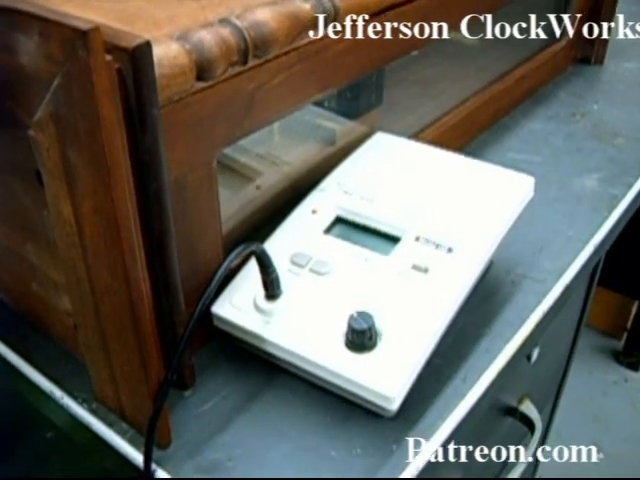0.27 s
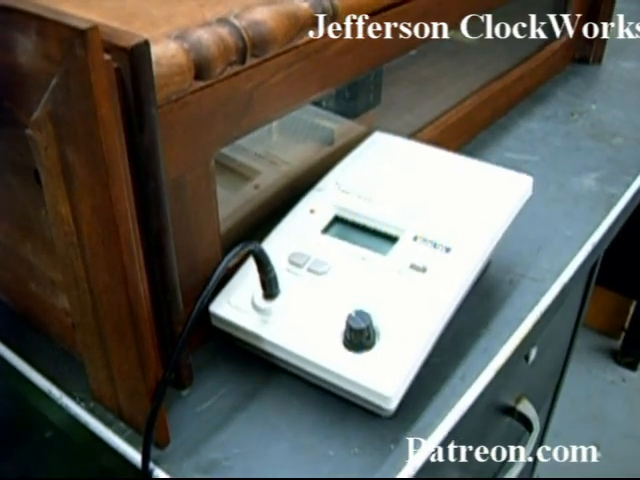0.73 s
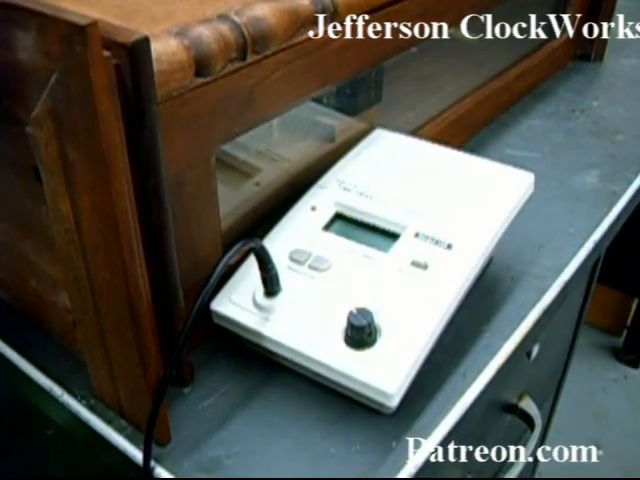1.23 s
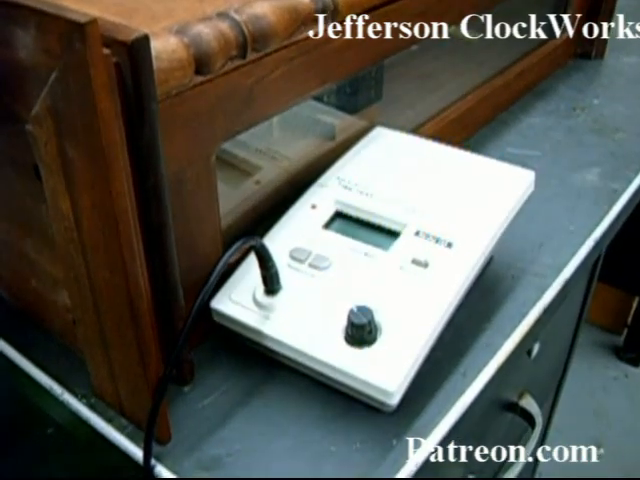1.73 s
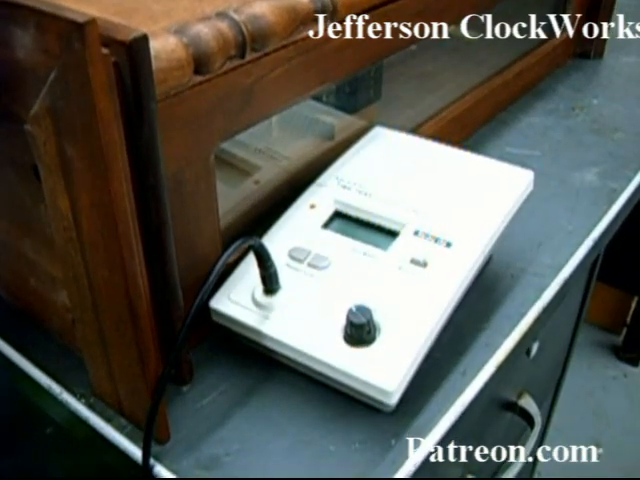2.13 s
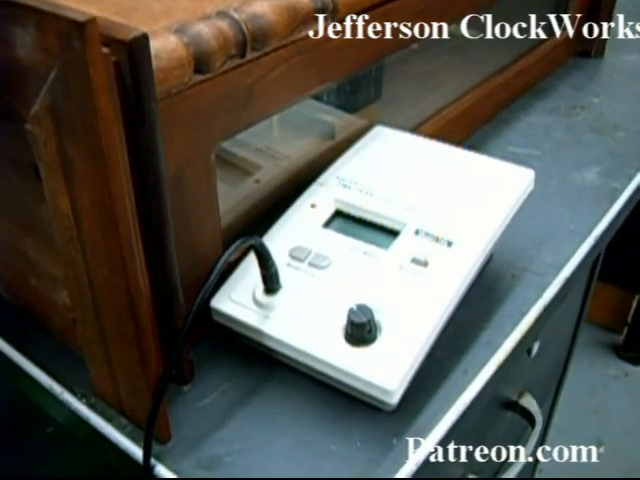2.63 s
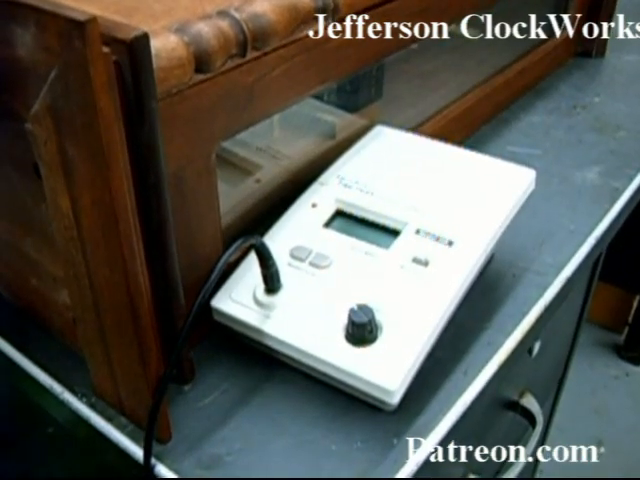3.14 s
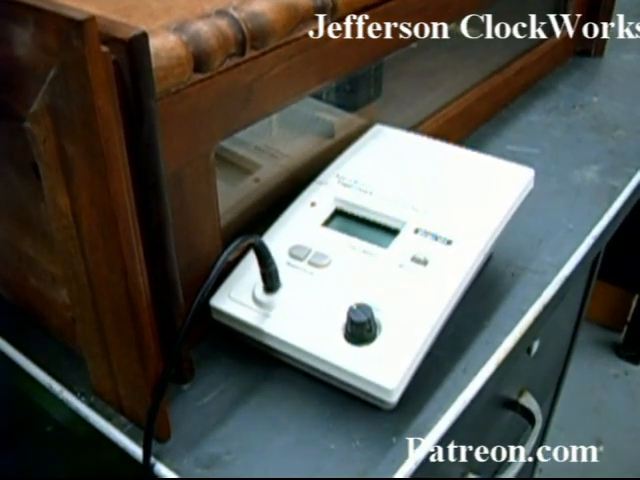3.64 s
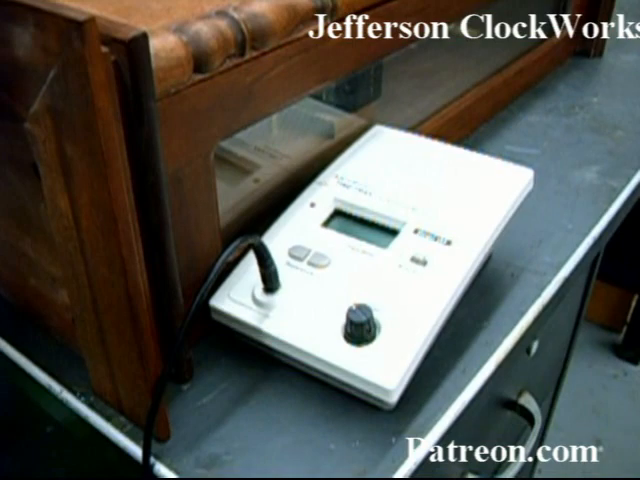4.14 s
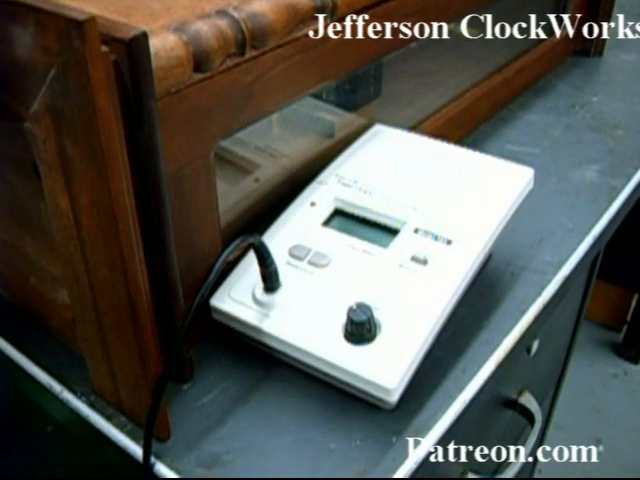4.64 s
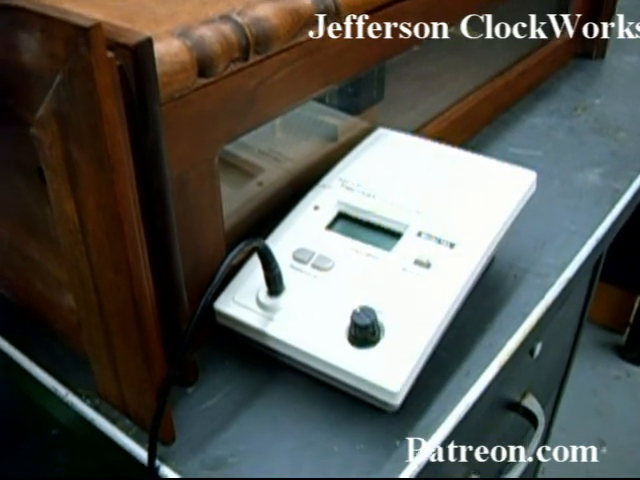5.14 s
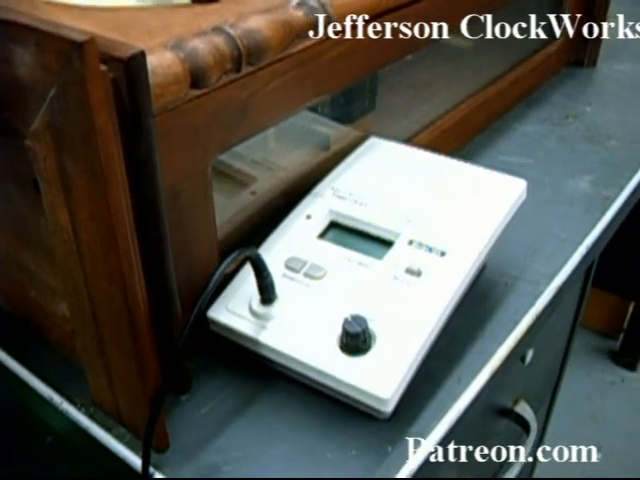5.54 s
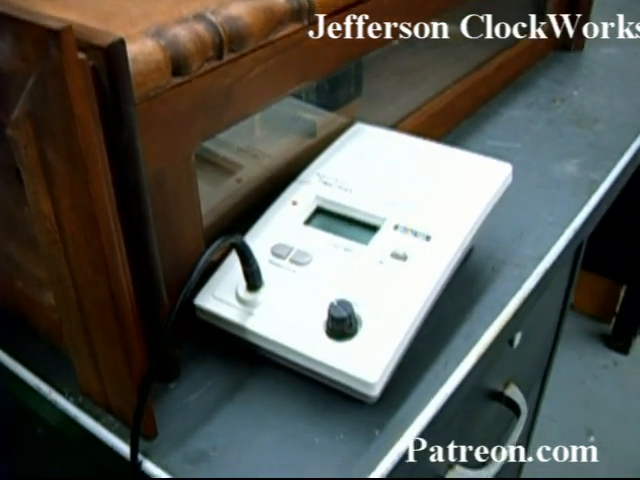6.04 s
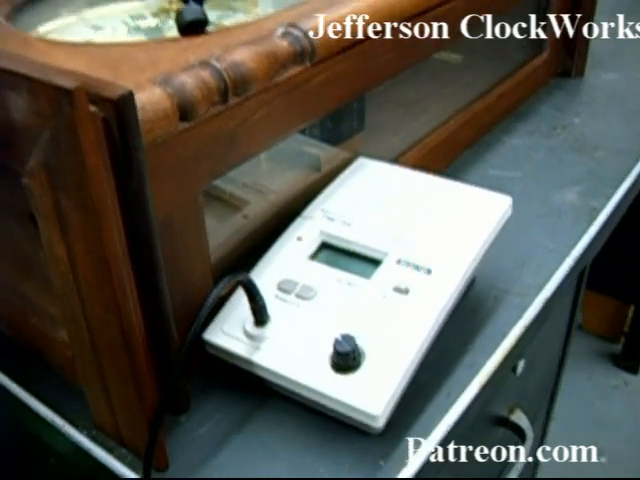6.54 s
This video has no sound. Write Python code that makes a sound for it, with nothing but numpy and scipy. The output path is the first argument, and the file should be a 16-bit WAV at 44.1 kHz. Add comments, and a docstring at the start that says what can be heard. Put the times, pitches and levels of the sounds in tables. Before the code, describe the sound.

Slow amplified clock ticks, short and boxy with a nasal metallic edge, sound regularly over constant soft hiss. Alternate ticks have a faint second click just behind them, and a thin high ring trails some beats. A small thump hides beside a tick past the middle, then dry plastic snaps, the strongest near six seconds. Close, nearly mono, band-limited pickup in a small room with slight reverberation.

```python
"""A quiet workshop hums and hisses throughout: shaped noise plus slowly wavering mains lines.
A pendulum clock ticks in its wooden case, picked up and played by the small loudspeaker of a timing box:
noisy contact forces excite decaying modes and cone resonances, and after every other beat the pallet
bounces once. Late on comes a low, broad thump, then the plastic shell around the microphone creaks:
each is an impulse with a short noise tail, filtered by a resonance."""
import sys
import numpy as np
from scipy import signal
from scipy.fft import rfft, irfft, next_fast_len
from scipy.io import wavfile
from scipy.ndimage import map_coordinates

SR = 44100
rng = np.random.default_rng(int(sys.argv[2]) if len(sys.argv) > 2 else 0)


def transcribe(signal):
    """Save signal, clipped to [-1, 1], as a 16-bit WAV file at the path in sys.argv[1]."""
    frames = np.atleast_2d(signal).T
    limited = np.clip(frames, -1, 1)
    pcm = np.round(limited * 32767).astype(np.int16)
    wavfile.write(sys.argv[1], SR, pcm)


N = 298798

RISE_S = 0.00049  # how fast the blow of a tooth builds


def amp(db):
    """Decibel law: the amplitude gain of a level in dB."""
    return 10 ** (np.asarray(db) / 20)


def unit(x):
    """Power normalisation: x scaled to rms 1."""
    return x / np.sqrt(np.mean(x ** 2) + 1e-20)


def along(points, hz):
    """Interpolation of (frequency, value) points on a logarithmic frequency axis."""
    f, v = np.transpose(points)
    return np.interp(np.log(hz + 1), np.log(f + 1), v)


def filtered(x, response):
    """Linear filtering: the spectrum of x times a complex response of frequency."""
    m = next_fast_len(x.shape[-1] + 8192)
    spectrum = rfft(x, m) * response(np.fft.rfftfreq(m, 1 / SR))
    return irfft(spectrum, m)[..., :x.shape[-1]]


def peak(f, hz, width_hz):
    """Damped resonator: one causal band-pass response of top gain 1."""
    return 1j * f * width_hz / (hz * hz - f * f + 1j * f * width_hz)


def wobble(rate):
    """Slow random modulation: a smooth curve through rate random knots a second."""
    knots = rng.standard_normal(int(N * rate / SR) + 4)
    return map_coordinates(knots, [np.arange(N) * rate / SR])


def add(track, s, x):
    """Superposition: mixes x into track from time s."""
    part = track[round(s * SR):][:len(x)]
    part += x[:len(part)]


def workshop():
    """Stationary noise and tones: air and preamplifier hiss, with slightly wavering mains hum."""
    # spectrum of room air and hiss: (frequency [Hz], relative spectral level [dB])
    air_spectrum = [(12, -47.5), (30, -22.5), (50, -9), (90, -10), (150, -7.5), (235, -0.5), (320, -3.5),
                    (500, -1.5), (1000, -5.5), (2800, -8), (3450, -12.5), (5100, -22), (5700, -45)]
    # mains lines: (frequency [Hz], relative level [dB])
    mains_lines = [(60, -81.5), (120, -74.5), (240, -75), (360, -78)]
    t = np.arange(N) / SR
    noise = filtered(rng.standard_normal(N), lambda f: amp(along(air_spectrum, f)))
    air = amp(-55.5 + 0.17 * wobble(0.33)) * unit(noise)  # rms level near -55.5 dB
    hum = np.zeros(N)
    for hz, db in mains_lines:
        level = amp(db + 5.5 + 1.5 * wobble(2.3))
        hum += level * np.sin(2 * np.pi * hz * t + 0.4 * wobble(14))
    return air + hum


def thump_and_creaks():
    """Impulse excitation of a resonance: a low thump, then snaps of the shell, each with a trace of rattle."""
    # a low thump, then snaps of the plastic shell: (time [s], peak level [dB], pitch [Hz])
    impulses = [(4.694, -38, 120), (5.082, -47, 2400), (5.0839, -32, 2430), (5.809, -41, 2700),
                (6.104, -22, 3250), (6.111, -35, 765), (6.125, -28, 923), (6.172, -41.5, 970),
                (6.276, -44, 686), (6.284, -46.5, 794)]
    rattle_t60_s = 0.019
    crackle_db, crackle_growth = 63.5, 2.58  # broad crackle over the resonance grows with the level
    out, t = np.zeros(N), np.arange(SR // 10) / SR
    for s, db, pitch_hz in impulses:
        impulse = t == 0
        rattle = 0.19 * rng.standard_normal(len(t)) * amp(-60 * t / rattle_t60_s)

        def response(f):
            """Parallel responses: one resonance beside a broad crackle."""
            resonance = peak(f, pitch_hz, 0.15 * pitch_hz + 280) ** 2
            crackle = peak(f, 1100, 3400) / (1 + 1j * f / 3000)
            return resonance + amp(crackle_db + crackle_growth * db) * crackle

        sound = filtered(impulse + rattle, response)
        add(out, s, amp(db) * sound / np.abs(sound).max())
    return out


def shop(x):
    """Reverberation by convolution: in a fresh noise tail each frequency dies at its own speed."""
    # decay of the room: (frequency [Hz], t60 [s])
    room_decay = [(300, 0.46), (2500, 0.23), (6000, 0.3)]
    hz, t, z = signal.stft(rng.standard_normal(SR // 2), SR, nperseg=256)
    decay = amp(-60 * t / along(room_decay, hz)[:, None])
    tail = signal.istft(z * decay, SR, nperseg=256)[1]
    delayed = np.pad(tail, (200, 0))  # samples before the first reflection
    return signal.fftconvolve(x, delayed / np.linalg.norm(tail))[:len(x)]


def contacts():
    """Impact schedule: (s, plates dB, case dB, rattle s, rod dB, graze s) of every beat and bounce."""
    # escapement beats: (time [s], relative blow on the plates [dB], rattle length [s],
    # relative rod ring [dB], graze before the blow [s])
    escapement = [(0.244, -20.5, 0.0071, -65, 0.0051), (1.1235, -14, 0.011, -54.5, 0.0011),
                  (2.0230, -18.5, 0.005, -62, 0.0016), (2.9053, -13, 0.007, -53.5, .0012),
                  (3.8010, -15.5, 0.0047, -47, .001), (4.6867, -13.5, 0.007, -47, .0012),
                  (5.5796, -14, 0.0048, -52.5, .001), (6.4679, -16, 0.0091, -57.5, .0015)]
    # the pallet lands again after every other beat: (time [s])
    landings = [0.2935, 2.074, 3.856, 5.634]
    plates_db, case_db, rattle_s = -33, -10, 0.012  # of a bounce
    rows = [(s, db, 0, *rest) for s, db, *rest in escapement]
    for s, beat in zip(landings, escapement[::2]):
        rod_db = beat[3] - 1  # against the beat before
        rows.append((s, plates_db, case_db, rattle_s, rod_db, 0))
    return sorted(rows)


def contact_forces(t, rattle_s, graze_s):
    """Impact excitation: a graze, a blow and a rattle as noise; returns the force and its longer crunch."""
    graze_db = -20  # the tooth brushes the pallet just before it lands
    slam_db, slam_s = 6.5, 0.00083  # the first impact stands out of the rattle
    crunch_db, crunch_t60_s = -2.5, 0.08  # the thin edges keep crunching after the firm contact
    since = np.maximum(t - graze_s, 0)  # time after the blow
    chatter = np.exp(-(since / rattle_s) ** 3) + amp(-15 - 60 * since / 0.06)  # firm, then loose
    # the contact comes in separate micro-impacts
    knocks = amp(2.34 * map_coordinates(rng.standard_normal(400), [t * 500]))
    build = 1 - np.exp(-(since / RISE_S) ** 3)
    slam = 1 + amp(slam_db) * np.exp(-since / slam_s)
    touch = rng.standard_normal(len(t)) * knocks * (amp(graze_db) + build * slam)
    crunch = touch * (chatter + amp(crunch_db - 60 * since / crunch_t60_s))
    return touch * chatter, crunch


def shaken(force, lo_hz, hi_hz):
    """Modal synthesis: one part of the clock and its share of the cone answer the force; energy 1."""
    # modes of plates and case: (frequency [Hz], level before random scatter [dB], t60 [s])
    case_modes = [(461.8, -7.5, 0.094), (508.3, -1, 0.045), (542.4, 5, 0.061), (584, 13.5, 0.037),
                  (624.3, 5.5, 0.031), (697.4, -14.5, 0.11), (820.6, -8, 0.073), (1026, -6, 0.29),
                  (1062, 10, 0.037), (1161.5, 5.5, 0.063), (1197, 14.5, 0.022), (1221, 3.5, 0.077),
                  (1340, -11.5, 0.16), (1644, -41, 0.22), (1986, -14, 0.065), (2300, -32.5, 0.061),
                  (2380, -34.5, 0.044), (2380, -20.5, 0.036), (2221.5, -7, 0.048), (2484, -16, 0.11),
                  (2590, -15.5, 0.13), (2495, -23, 0.11), (2560, -13.5, 0.033), (2610, -10.5, 0.066),
                  (2718, -13, 0.036), (2798, -11.5, 0.053), (2930, -11, 0.036), (3510, -27, 0.046),
                  (3734, -36, 0.17)]
    # loudspeaker cone resonances: (frequency [Hz], width [Hz], relative level [dB])
    cone_modes = [(624, 240, -2), (1190, 290, 11.5), (1770, 570, -17.5), (2387, 154, 21.5), (2744, 273, 14),
                  (4200, 890, -10.5), (4690, 380, -7.5), (5230, 140, -6.5), (5890, 180, 0)]
    t = np.arange(len(force)) / SR
    modes = [m for m in case_modes if lo_hz <= m[0] < hi_hz]
    hz, level_db, t60 = np.transpose(modes)[..., None]
    late = (1 - np.exp(-t * hz / 3)) ** 2  # panels take a few cycles to get going
    decay = amp(level_db + rng.normal(0, 3.28, hz.shape) - 60 * t / t60)
    ring = decay * late * np.sin(2 * np.pi * hz * t)

    def cone(f):
        """Modal sum: successive cone resonances alternate in sign."""
        total = 0
        for k, (c, w, db) in enumerate(cone_modes):
            if lo_hz <= c < hi_hz:
                total = total + (-1) ** k * amp(db) * peak(f, c, w) * peak(f, c, 3 * w)
        return total

    case = signal.fftconvolve(force, ring.sum(axis=0))[:len(t)]
    sound = case + amp(19.0) * filtered(force, cone)
    return sound / np.linalg.norm(sound)


def small_loudspeaker(x):
    """Saturation and high-pass radiation: the little amplifier runs out of swing, the cone gives no bass."""
    limited = x / (1 + np.abs(x / 0.36) ** 3) ** (1 / 3)
    return filtered(limited, lambda f: (1j * f / (300 + 1j * f)) ** 2)


def rod_ring(t, rod_db):
    """Beating of close modes: a lightly damped steel rod rings in two planes of swing."""
    # one frequency for each plane: (first [Hz], second [Hz])
    rod_hz = (2348, 2354)
    first = np.sin(2 * np.pi * rod_hz[0] * t)
    second = 0.45 * np.sin(2 * np.pi * (rod_hz[1] * t + rng.random()))
    onset = 1 - np.exp(-t / 0.03)
    fade = np.cos(np.pi * t)  # reaches zero at half a second
    return amp(rod_db - 60 * t / 1.8) * (first + second) * onset * fade


def beats():
    """Excited resonance: the rattle of tooth on pallet shakes the modes of the case and loudspeaker cone."""
    # limits between which wood, door, plates and thin edges ring: (frequency [Hz])
    part_limits = [0, 900, 1600, 3200, 8000]
    wood_db, door_db, edge_db = -25, -30.5, -18.5  # edges relative to the plates
    out, t = np.zeros(N), np.arange(SR // 2) / SR
    for s, db, case_db, rattle_s, rod_db, graze_s in contacts():
        force, crunch = contact_forces(t, rattle_s, graze_s)
        pushes = [force, force, force, crunch]
        parts = [shaken(push, lo, hi) for push, lo, hi in zip(pushes, part_limits, part_limits[1:])]
        # the blow reaches the wood through the seatboard a little later
        parts[0] = np.roll(parts[0], round(0.0017 * SR))
        knock = amp([wood_db + case_db, door_db + case_db, db, db + edge_db]) @ parts
        knock = knock * np.sqrt(0.0095 * SR)  # energy spread over the length of a contact
        tick = small_loudspeaker(knock)
        sound = tick + amp(-13.5) * shop(tick) + rod_ring(t, rod_db)
        add(out, s - graze_s - RISE_S, sound)
    return out


def scene():
    """Superposition at one microphone, which feeds both channels."""
    return np.tile(beats() + thump_and_creaks() + workshop(), (2, 1))


def record(dry):
    """Band-limited conversion: rolled-off treble, a faint mirror image, slight overload and hiss."""
    # microphone treble: (frequency [Hz], gain [dB])
    treble = [(3450, 0), (3900, -9), (5300, -6), (5900, -28.5), (6300, -49.5)]
    clock_hz, top_hz = 16000, 14600  # the converter mirrors the sound about its clock
    kept = filtered(dry, lambda f: amp(along(treble, f)))
    mirror = amp(-46.0) * kept * np.cos(2 * np.pi * clock_hz * np.arange(N) / SR)
    # the channels differ slightly above 1400 Hz
    apart = filtered(kept[0], lambda f: 1j * (f > 1400) * np.abs(peak(f, 2500, 6000)) ** 2)
    apart = amp(-32.5) * apart * [[1], [-1]]
    grit = amp(-40.5) * kept * np.abs(kept) ** 0.85  # slight overload adds faint overtones
    shared_hiss = rng.standard_normal(N)
    hiss = amp(-100) * (shared_hiss + 0.54 * rng.standard_normal(dry.shape))
    return filtered(kept + mirror + grit + apart + hiss, lambda f: f < top_hz)


dry = scene()
out = record(dry)
transcribe(out)
```